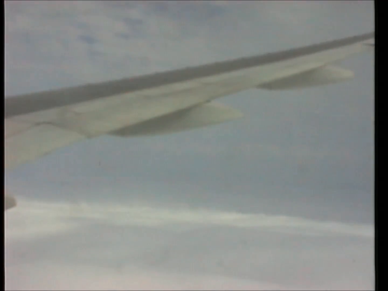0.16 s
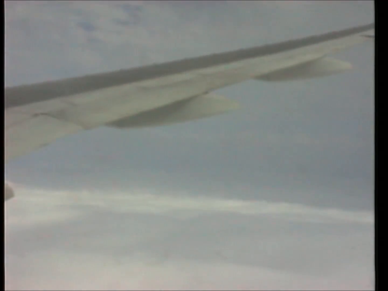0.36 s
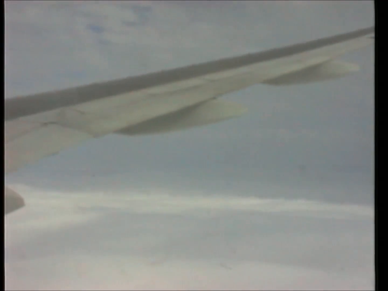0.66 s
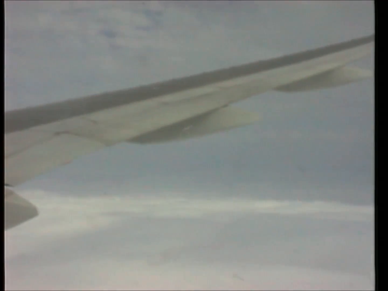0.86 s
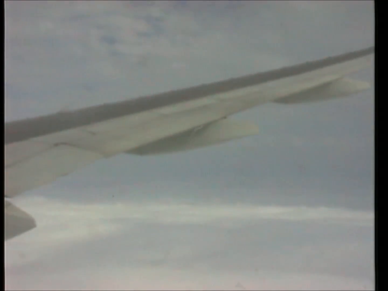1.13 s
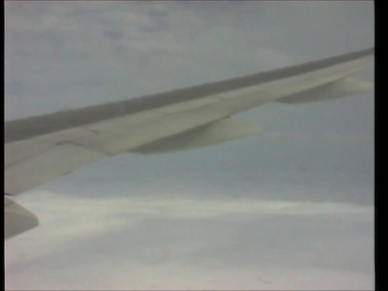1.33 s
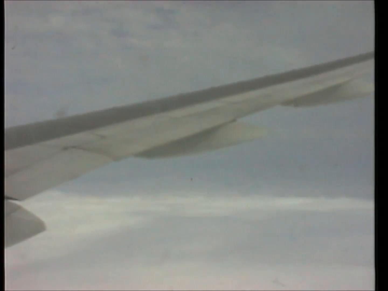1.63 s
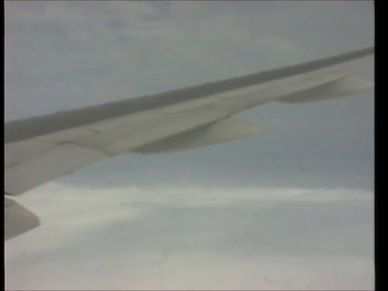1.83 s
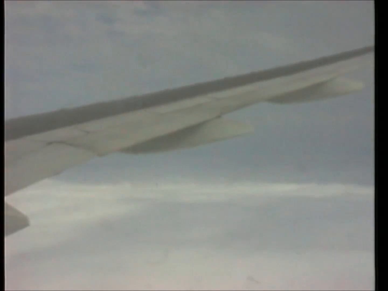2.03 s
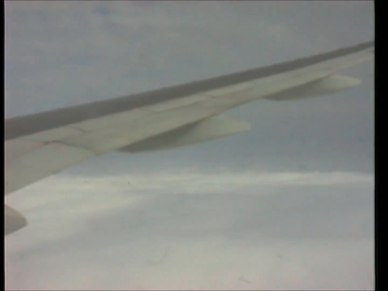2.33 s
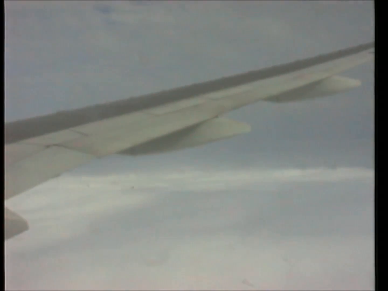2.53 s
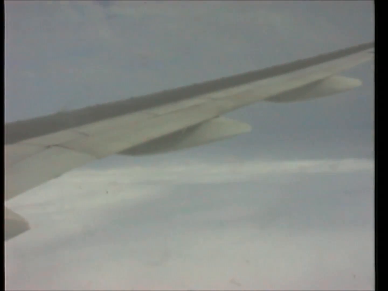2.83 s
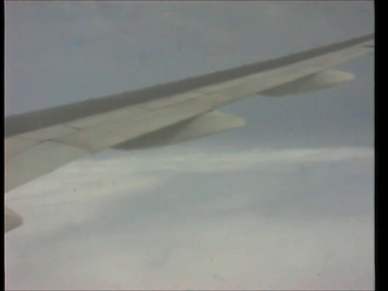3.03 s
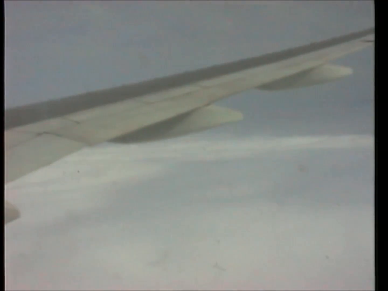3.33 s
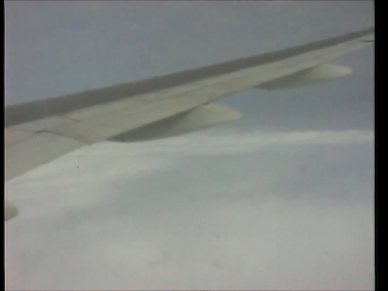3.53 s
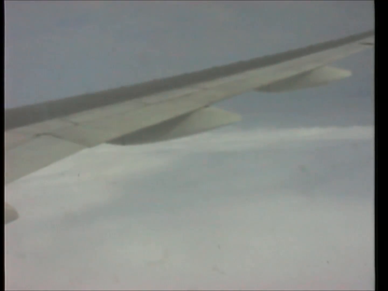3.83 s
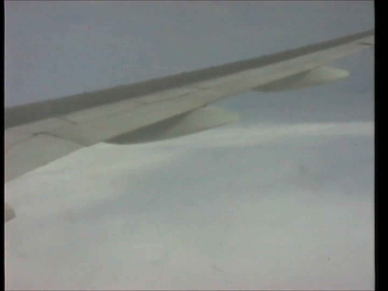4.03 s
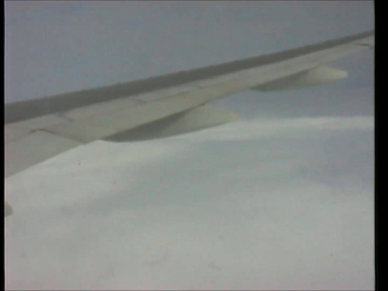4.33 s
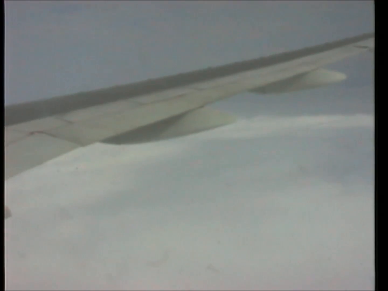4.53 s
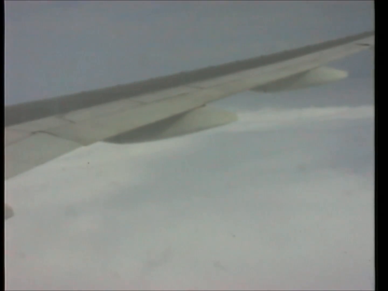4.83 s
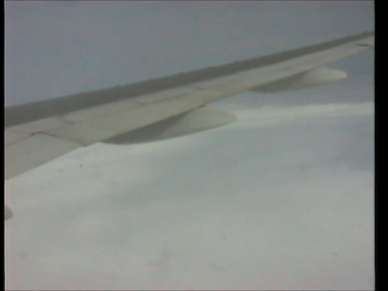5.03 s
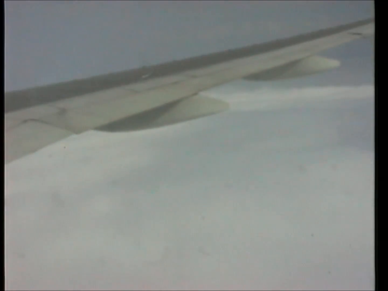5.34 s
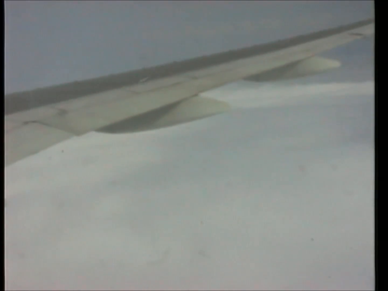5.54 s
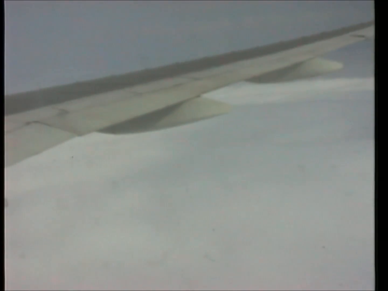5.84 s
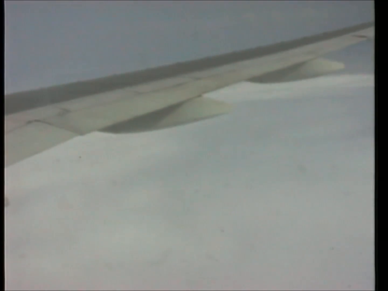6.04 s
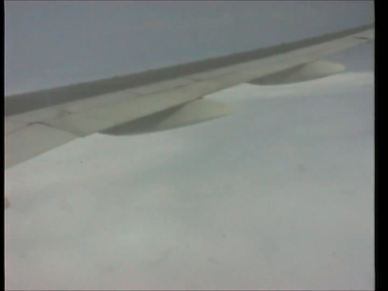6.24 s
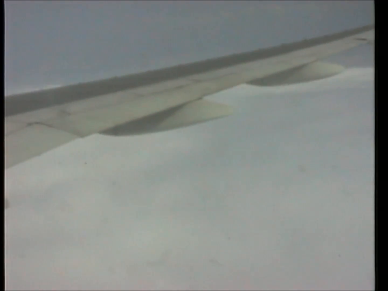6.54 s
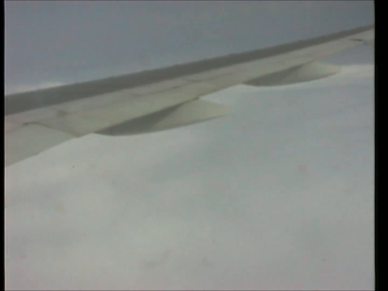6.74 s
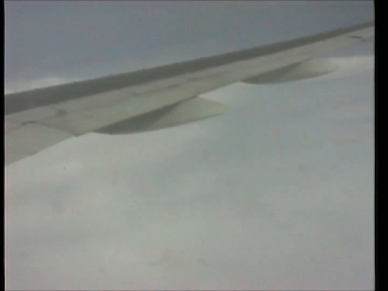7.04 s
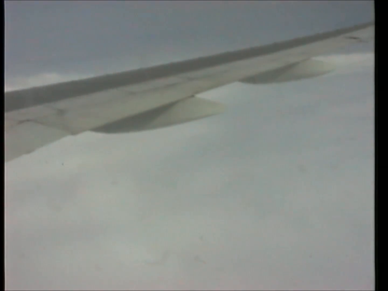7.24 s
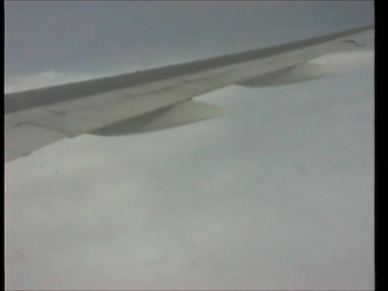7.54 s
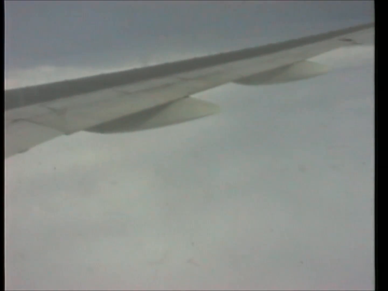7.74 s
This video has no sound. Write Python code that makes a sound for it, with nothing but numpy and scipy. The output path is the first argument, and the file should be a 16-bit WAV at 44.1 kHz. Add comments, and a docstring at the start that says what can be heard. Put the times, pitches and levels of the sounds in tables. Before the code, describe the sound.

A heavy, even rumble of jet engines and rushing air fills a cruising airliner's cabin from start to finish, heard beside the window. Soft hiss from the air vents and a faint hum lie over it. The microphone is on a hand-held camera, whose very faint high motor whine swells and fades, while fingers cause scattered dull knocks, brief creaks and tiny clicks on the plastic, busiest near the beginning.

```python
"""The roar of a cruising airliner from a window seat: engines and airflow drive noise through the
fuselage, and the cabin's resonances colour it. Air vents hiss on top and a faint hum sits inside.
Close up, the tape motor of a hand-held camera whines thinly, and its plastic case knocks, creaks
and ticks under the fingers that brush it."""
import sys
import numpy as np
from scipy import signal
from scipy.fft import rfft, irfft, next_fast_len
from scipy.io import wavfile
from scipy.ndimage import map_coordinates

SR = 44100
rng = np.random.default_rng(int(sys.argv[2]) if len(sys.argv) > 2 else 0)


def unload_audio(sound):
    """Save the sound as a 16-bit wav file, at the path given as the first command line argument."""
    columns = np.transpose(np.atleast_2d(sound))
    # keep every value between -1 and 1, then stretch to whole-number steps
    steps = np.round(np.clip(columns, -1, 1) * 32767)
    wavfile.write(sys.argv[1], SR, steps.astype(np.int16))


N = 347495


def amp(db):
    """Decibels to gain."""
    return 10 ** (np.asarray(db) / 20)


def unit(x):
    """x scaled to rms 1."""
    return x / np.sqrt(np.mean(x ** 2) + 1e-20)


def along(points, hz):
    """Read a curve of (Hz, value) points on a log frequency axis."""
    freqs, values = np.transpose(points)
    return np.interp(np.log(hz + 1), np.log(freqs + 1), values)


def wobble(rate, size=N):
    """A smooth random curve, rate knots a second."""
    knots = rng.standard_normal(int(size * rate / SR) + 4)
    return map_coordinates(knots, [np.arange(size) * rate / SR], order=2)


def filtered(x, response):
    """x through a filter whose gain is response(hz)."""
    n = x.shape[-1]
    padded = next_fast_len(n + 4096)
    return irfft(rfft(x, padded) * response(np.fft.rfftfreq(padded, 1 / SR)), padded)[..., :n]


def noise(eq, shape):
    """Noise of rms 1, shaped by an EQ curve of (Hz, dB) points."""
    return unit(filtered(rng.standard_normal(shape), lambda hz: amp(along(eq, hz))))


def pan(lean_db):
    """Left and right gains of mean power 1; lean_db is left minus right."""
    gains = np.vstack([amp(lean_db / 2), amp(-lean_db / 2)])
    return gains / np.sqrt(np.mean(gains ** 2, axis=0))


def add(track, start_s, sound):
    """Mix a sound into the track at start_s."""
    rest = track[:, max(round(start_s * SR), 0):][:, :sound.shape[-1]]
    rest += sound[..., :rest.shape[-1]]


# Bright, scratchy plastic, for the brushing and the ticks. Each row: frequency in Hz, EQ gain in dB.
SCRATCH_EQ = [(1000, -29), (2500, -2), (3800, 5), (9000, -2.5), (12000, -7.5), (15500, -17.5)]


def brushing(db=-69, swing_db=4.0):
    """Skin brushes the case in faint, uneven scratches."""
    scratch = noise(SCRATCH_EQ, (2, N))
    pressure = amp(swing_db * (wobble(4.4) + wobble(28)))
    return amp(db) * unit(pressure * scratch)


# Tick cues. Each row: start in seconds, relative level in dB, tail t60 in seconds.
TICK_CUES = [(0.0532, -37.5, .3), (0.326, -40, .14), (0.525, -39, .3), (1.3152, -33.5, .1),
             (1.8225, -29.5, 0.11), (1.862, -42.5, .14), (2.4802, -39.5, .1), (2.934, -39, 0.14),
             (2.988, -32, .18), (3.04, -38.5, .2), (3.748, -32.5, .07), (6.231, -40, .14),
             (6.275, -37.5, .12), (6.559, -35.5, .07), (7.345, -26, .16), (7.468, -42.5, .14)]


def ticks(gain_db=-9, tail_db=-7, click_t60=0.024, attack_s=0.0009):
    """Seams in the plastic let go with a dry, bright click and a brief scratchy tail."""
    out, t = np.zeros((2, N)), np.arange(SR // 8) / SR
    for start, db, tail_t60 in TICK_CUES:
        click = amp(-60 * t / click_t60)
        tail = amp(tail_db - 60 * t / tail_t60)
        envelope = (1 - np.exp(-t / attack_s)) * (click + tail)
        add(out, start, amp(db + gain_db) * noise(SCRATCH_EQ, (2, len(t))) * envelope)
    return out * pan(-2.2)


# The plastic case's modes. Each row: frequency in Hz, relative level in dB, t60 in seconds at damping 1.
CASE_MODES = [(578, -6, 0.024), (607, 2, 0.044), (730, -12, 0.024), (839, -8, 0.055), (1156, -12, 0.025),
              (1182, -11.5, 0.048), (1217, -11, 0.026), (1320, -10.5, 0.035), (1610, -18.5, 0.028),
              (2475, -18, 0.017), (2630, -13.5, 0.022), (3540, -16, 0.018)]


def case_ring(tilt_db=0, attack_s=0.002, damping=1, detune=0.012):
    """The case rings from one blow, scaled to peak 1; the grip alters its modes each time."""
    t = np.arange(SR // 8) / SR
    ring = np.zeros(len(t))
    for hz, db, t60 in CASE_MODES:
        tilt = tilt_db * max(np.log2(hz / 1000), 0)  # per octave above 1 kHz
        decay = amp(db + tilt + rng.normal(0, 2.5) - 60 * damping * t / t60)
        detuned_hz = hz * (1 + detune * rng.standard_normal())
        ring += decay * np.sin(2 * np.pi * (detuned_hz * t + rng.random()))
    ring *= 1 - np.exp(-t / attack_s)
    return ring / np.abs(ring).max()


# Dull skin on plastic, and a firm grip's scrape. Each row: frequency in Hz, EQ gain in dB.
RUSTLE_EQ = [(250, -33), (560, 9), (850, -5), (1300, -5), (1800, -21.5), (2700, -27), (5000, -38),
             (12000, -59.5)]
RASP_EQ = [(800, -17.5), (1400, -1), (2600, -1), (3600, -8.5), (5500, -17.5), (10000, -37)]
# Creak cues. Each row: centre in seconds, half-length in seconds, level in dB, rasp offset in dB.
CREAK_CUES = [(0.88, 0.034, -30.5, -11.5), (1.114, 0.039, -35.5, -16), (2.772, 0.056, -32, -14.5),
              (3.18, 0.049, -37.5, -15.5), (3.386, 0.17, -34.5, -18), (3.87, 0.047, -36, -16),
              (4.922, 0.04, -31, -11.5), (6.301, 0.11, -35, -16.5), (6.616, 0.12, -39.5, -18),
              (7.204, 0.06, -42.5, -17)]


def creaks(slips_per_s=220, ring_db=-4, rustle_db=-3, rough_db=3):
    """Fingers stick and slip on the case: uneven runs of tiny blows that ring and rasp, in a rustle."""
    out, t = np.zeros((2, N)), np.arange(SR // 2) / SR
    middle = t.mean()
    rub = lambda eq: unit(amp(rough_db * wobble(150, size=len(t))) * noise(eq, len(t)))
    for centre, half_length, db, rasp_db in CREAK_CUES:
        slips = (rng.random(len(t)) < slips_per_s / SR) * rng.uniform(0.49, 1, len(t))
        ring = unit(signal.fftconvolve(slips, case_ring(damping=0.65))[:len(t)])
        grip = amp(db) * np.exp(-2 * ((t - middle) / half_length) ** 2)
        friction = amp(ring_db) * ring + amp(rustle_db) * rub(RUSTLE_EQ) + amp(rasp_db) * rub(RASP_EQ)
        add(out, centre - middle, grip * friction)
    return out * pan(-11.5)


# The snap at the front of a knock. Each row: frequency in Hz, EQ gain in dB.
SNAP_EQ = [(300, -29.5), (1000, 1.5), (2600, 0), (5000, -4.5), (9000, -29.5), (15000, -41.5)]
# Knock cues. Each row: start in seconds, level in dB, snap offset in dB.
KNOCK_CUES = [(0.347, -19, -20), (0.468, -24, -16), (0.528, -16.5, -22), (0.716, -20, -21),
              (0.885, -18, -23.5), (0.936, -25.5, -23), (1.049, -22, -12.5), (1.108, -22.5, -24),
              (1.122, -19.5, -20), (1.371, -19, -9), (1.494, -23.5, -11.5), (2.48, -14, -11.5),
              (2.501, -19, -16.5), (2.736, -23, -19), (3.17, -22.5, -26), (3.492, -20.5, -16),
              (3.853, -18.5, -20), (3.879, -23, -23), (4.097, -22, -17.5), (4.255, -30, -4.5),
              (4.481, -19, -21), (4.804, -23, -23), (4.923, -18.5, -16.5), (5.381, -23, -10.5),
              (6.107, -22.5, -22), (6.176, -22, -18.5), (6.259, -20.5, -14.5), (6.287, -22, -15)]


def knocks(ring_db=-0.5, snap_t60=0.015, dulling=0.14):
    """The case shifts in the hand: a short snap, then a ring that is duller the weaker the knock."""
    out, t = np.zeros((2, N)), np.arange(SR // 8) / SR
    hardest_db = max(db for _, db, _ in KNOCK_CUES)
    for start, db, snap_db in KNOCK_CUES:
        snap = noise(SNAP_EQ, (2, len(t))) * amp(-60 * t / snap_t60)
        ring = case_ring(tilt_db=dulling * (db - hardest_db))
        add(out, start, amp(db) * (amp(ring_db) * ring + amp(snap_db) * snap))
    return out * pan(-12.0)


MOTOR_HZ = 503.65  # the tape motor's rate; harmonics 6 to 9 swell and fade, the 13th whines faintly
# The bed of motor and gear whines. Each row: pitch in Hz, relative level in dB, left minus right in dB.
STEADY_WHINES = [(2126, -68, -4), (2613, -68, 0), (3116, -69, 3), (3318, -70, 5), (3431, -71, 1),
                 (3620, -71, 4), (3776, -72, 4), (3824, -71, 8), (3870, -70, 8), (4123, -69, -1),
                 (4233, -71, 1), (4328, -69, -2), (4737, -73, -7), (5948, -79, -1), (6136, -78, 7),
                 (6451, -79, -8), (6547, -73, -4), (6642, -78, 0), (7143, -79, 3), (7461, -79, -11),
                 (7792, -79, -8), (7942, -73, 8), (8091, -80, -6), (8242, -72, -14), (8392, -79, 0)]
# Fader rides for four motor harmonics and the loudest gear. Each row: time in seconds, level in dB.
LEVEL_6TH = [(0.0, -59.5), (0.7, -66), (1.0, -67), (1.33, -56), (1.6, -65), (2.7, -63), (3.03, -59.5),
             (3.15, -60), (3.31, -53.5), (3.62, -63), (5.75, -70.5), (5.98, -59), (6.2, -68), (7.2, -72),
             (7.88, -62)]
LEVEL_7TH = [(0.0, -65), (0.38, -55), (0.75, -58), (1.3, -67.5), (2.2, -59.5), (2.7, -66.5), (4.2, -64.5),
             (4.7, -58), (5.1, -62), (5.7, -70), (6.15, -58), (6.45, -53), (6.92, -76), (7.88, -65)]
LEVEL_8TH = [(0.0, -58), (0.25, -59.5), (0.35, -63), (0.77, -65), (1.19, -49.5), (1.75, -72), (1.91, -59.5),
             (2.57, -62), (2.66, -52.5), (2.85, -57), (2.95, -61.5), (3.29, -61), (3.42, -52), (3.62, -56),
             (3.77, -53.5), (3.9, -66), (3.99, -62), (4.26, -57.5), (4.52, -71), (4.63, -56), (4.85, -57.5),
             (5.02, -52.5), (5.13, -58.5), (5.36, -56), (5.45, -67), (6.12, -60), (6.28, -52),
             (6.38, -57.5), (6.56, -52), (6.78, -65), (7.0, -56), (7.13, -60), (7.28, -54), (7.45, -59),
             (7.68, -60), (7.88, -56)]
LEVEL_9TH = [(0.0, -68), (2.0, -77.5), (3.6, -69), (3.88, -61), (4.15, -74), (5.65, -73), (5.85, -59),
             (6.1, -74), (6.8, -65.5), (7.88, -72)]
LEVEL_GEAR = [(0.0, -71), (0.35, -63), (0.9, -78), (2.7, -72), (3.2, -67), (3.85, -64), (4.4, -74.5),
              (6.55, -71.5), (6.9, -61), (7.25, -64), (7.6, -72), (7.88, -72)]
# The whines that swell and fade. Each row: pitch in Hz, fader ride, left minus right in dB.
SWELLING_WHINES = [(6 * MOTOR_HZ, LEVEL_6TH, 8), (7 * MOTOR_HZ, LEVEL_7TH, -11),
                   (8 * MOTOR_HZ, LEVEL_8TH, 4), (9 * MOTOR_HZ, LEVEL_9TH, 0), (4439, LEVEL_GEAR, 0)]


def tape_motor(bed_db=-2.0, flutter=0.0002, waver_db=3, shiver_db=1.4, ripple_hz=54.6, ripple=0.31):
    """The tape drive's whines follow one nearly steady speed; the strong ones swell and ripple fast."""
    t = np.arange(N) / SR
    motor_time = t + np.cumsum(flutter * wobble(25)) / SR
    whine = lambda hz: np.sqrt(2) * np.sin(2 * np.pi * (hz * motor_time + rng.random()))
    bed, swells = np.zeros((2, N)), np.zeros((2, N))
    for hz, db, lean_db in STEADY_WHINES:
        bed += amp(db + waver_db * wobble(2.5)) * whine(hz) * pan(lean_db)
    for hz, ride, lean_db in SWELLING_WHINES:
        ride_db = np.interp(t, *np.transpose(ride))
        swells += amp(ride_db + shiver_db * wobble(12)) * whine(hz) * pan(lean_db)
    tremolo = 1 + ripple * np.sin(2 * np.pi * ripple_hz * motor_time)
    return amp(bed_db) * bed + swells * tremolo


def hum(hz=721, db=-55, waver_db=3):
    """A faint, wavering machine tone in the cabin."""
    tone = np.sin(2 * np.pi * hz * np.arange(N) / SR + 0.5 * wobble(6))
    return amp(db) * unit(amp(waver_db * wobble(4.2)) * tone) * pan(-1)


# The cabin's stereo width. Each row: frequency in Hz, left-right correlation before the phase shift.
STEREO_LIKENESS = [(35, 0.42), (90, 0.82), (170, 0.99), (260, 0.76), (350, 1), (500, 0.46), (650, 1),
                   (780, 0.5), (1350, 0.81), (2100, 0.56), (4000, 0.21), (6000, -0.16), (10000, -0.14)]
# Its balance. Each row: frequency in Hz, left minus right in dB.
STEREO_LEAN = [(60, 2), (110, -11), (200, -7.0), (380, -9.0), (700, -3.5), (1290, -5), (2380, -0.5),
               (4400, -0.5), (8120, -1.5), (15000, 0.5)]
# Its phase shift. Each row: frequency in Hz, lead of the left side in radians.
STEREO_LEAD = [(30, .1), (100, 1.1), (260, 0.064), (360, 0.23), (650, 0.41), (790, 1.4), (950, 0.52),
               (1650, 0.36), (2050, 2.15), (3000, .1)]


def cabin_noise(eq_db):
    """Stereo noise of rms 1 coloured by eq_db(hz); standing waves by the wall skew balance and phase."""
    def mid_side_gains(hz):
        width = np.arccos(np.clip(along(STEREO_LIKENESS, hz), -1, 1)) / 2
        return amp(eq_db(hz)) * [np.cos(width), np.sin(width)]

    def standing_waves(hz):
        phase = along(STEREO_LEAD, hz) * np.array([[0.5], [-0.5]])
        return pan(along(STEREO_LEAN, hz)) * np.exp(1j * phase)

    mid, side = filtered(rng.standard_normal((2, N)), mid_side_gains)
    return unit(filtered(np.array([mid + side, mid - side]), standing_waves))


# The airy hiss of the vents. Each row: frequency in Hz, EQ gain in dB.
VENT_EQ = [(700, -27.5), (1500, -3.5), (1900, 1.5), (2600, -1), (3100, -6), (3700, -5.5), (4200, -5.5),
           (5200, -13.5), (6300, -13.5), (8200, -16.5), (9000, -22.5), (12300, -27), (15700, -47.5)]


def vents(db=-47.5, flutter_db=1.04):
    """Air hisses from the overhead nozzles with a slight, fast flutter."""
    return amp(db + flutter_db * wobble(40)) * cabin_noise(lambda hz: along(VENT_EQ, hz))


# The low, heavy body of the roar through the wall. Each row: frequency in Hz, EQ gain in dB.
ROAR_EQ = [(20, -37), (45, -35.5), (72, -28), (98, -14.5), (122, -3), (200, -4.5), (330, -0.5),
           (410, -10.5), (620, -18), (720, -24), (950, -27.5), (1380, -29), (1600, -39), (3200, -68.5)]
# Resonances of the cabin and its panels. Each row: centre in Hz, width in Hz, boost in dB.
CABIN_RESONANCES = [(125.7, 16, 4), (168.1, 30, 7), (188.3, 11, 4), (237, 23.4, 8), (259, 15, 3.5),
                    (328.3, 34.8, 8), (591, 130, 2.5), (807, 63, 5), (1010, 90, 7), (1394.5, 52, 11.5),
                    (1673, 24, 13)]


def roar(db=-20.5, drift_db=0.59):
    """Turbulence and jet noise come through the fuselage, coloured by the cabin's resonances."""
    def eq_db(hz):
        peaks = sum(boost / (1 + (2 * (hz - centre) / width) ** 2)
                    for centre, width, boost in CABIN_RESONANCES)
        return along(ROAR_EQ, hz) + peaks

    return amp(db + drift_db * wobble(3.7)) * cabin_noise(eq_db)


def scene():
    """The cabin, with the camera's own small sounds close up."""
    cabin = roar() + vents() + hum()
    return cabin + tape_motor() + knocks() + creaks() + ticks() + brushing()


def record(dry, top_hz=15800):
    """A brick-wall low-pass at the camera's band limit."""
    return filtered(dry, lambda hz: hz < top_hz)


dry = scene()
out = record(dry)
unload_audio(out)
```